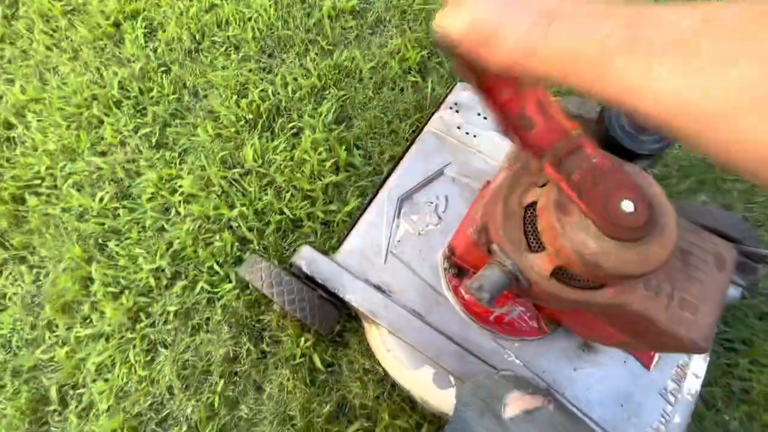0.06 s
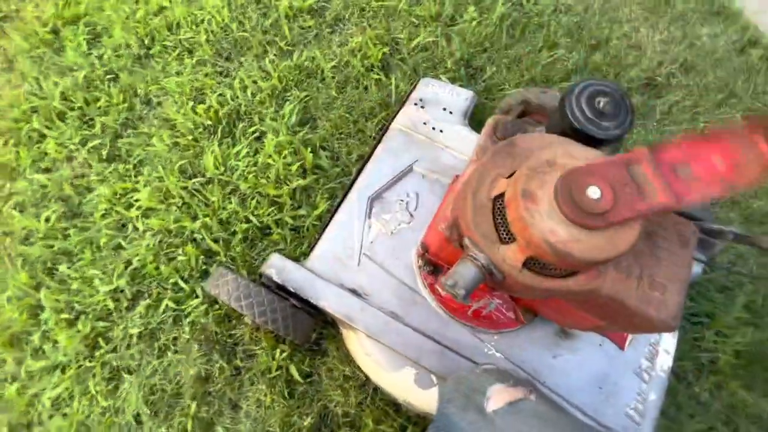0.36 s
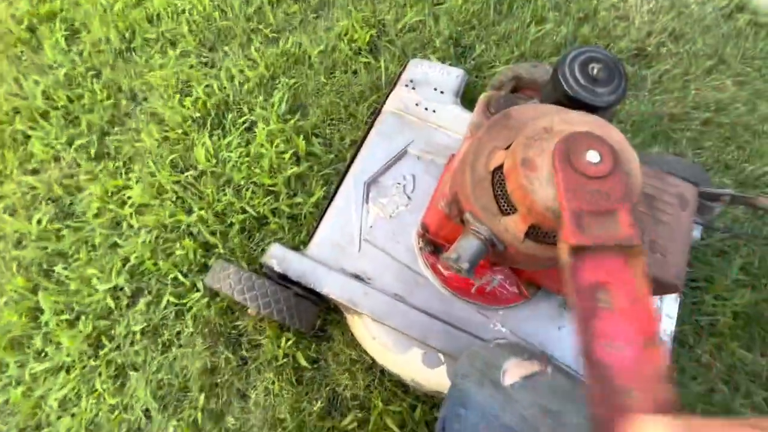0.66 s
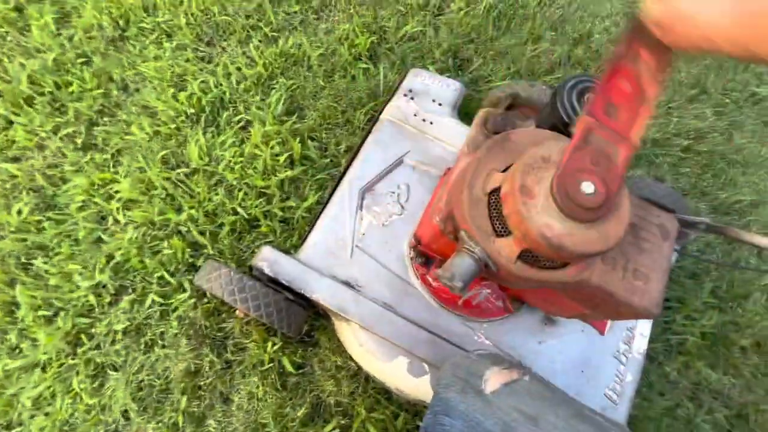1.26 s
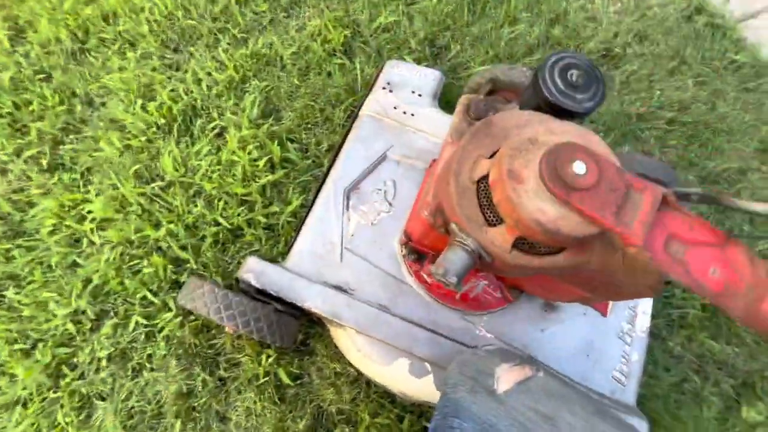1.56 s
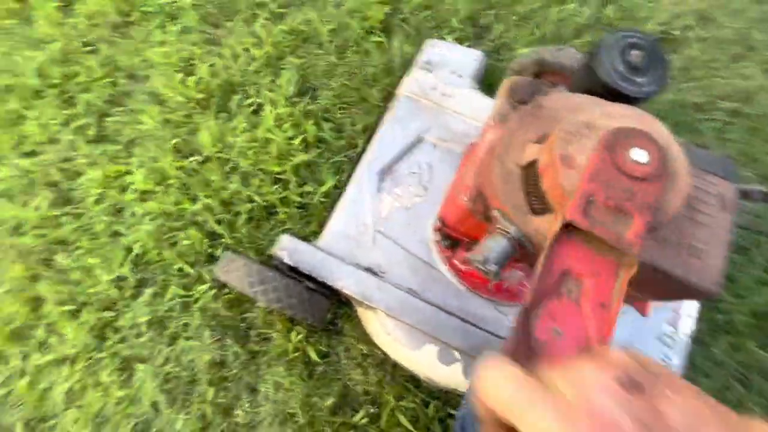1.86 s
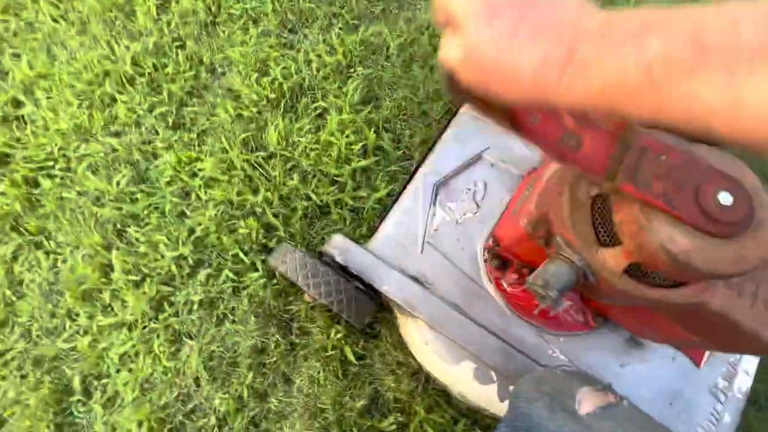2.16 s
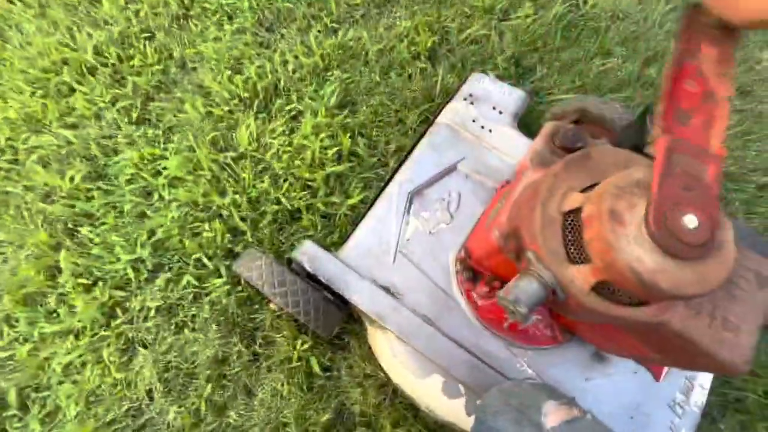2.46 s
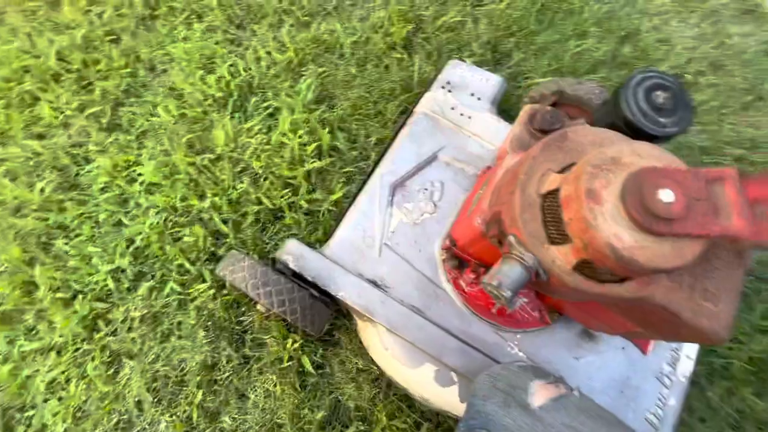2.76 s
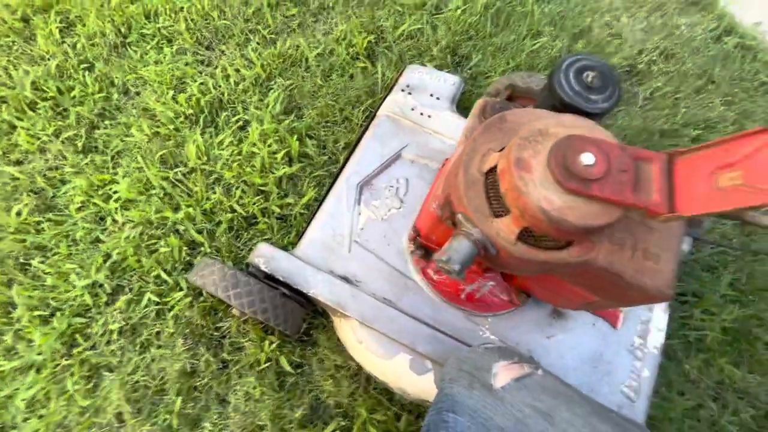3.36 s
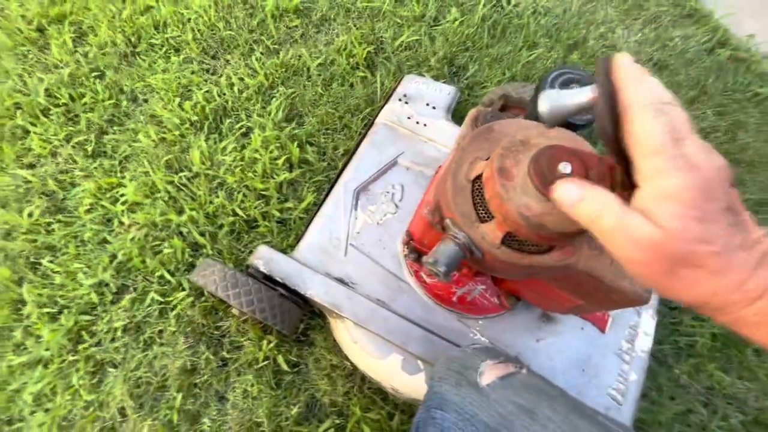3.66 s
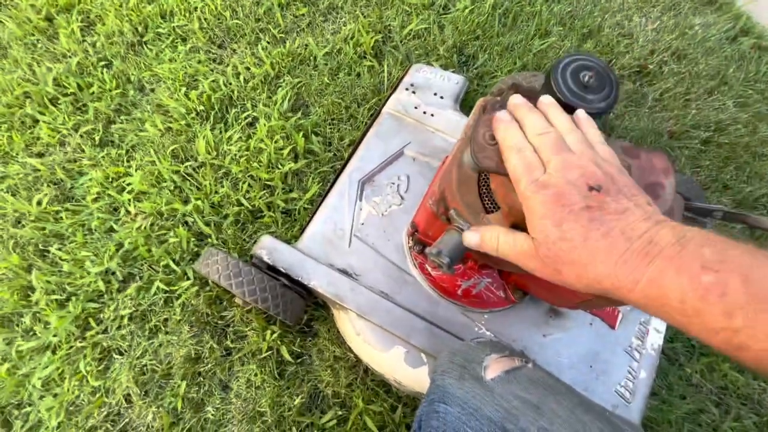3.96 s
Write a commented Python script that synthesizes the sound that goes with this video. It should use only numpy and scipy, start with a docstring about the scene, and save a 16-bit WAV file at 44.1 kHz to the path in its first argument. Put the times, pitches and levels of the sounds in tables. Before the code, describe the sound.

An old mower's wind-up starter ratchets at arm's length on a lawn, its ringing clicks slowing over light grinding. A dull thud and soft hinge ticks follow, then the handle folds with a loud clack, over faint outdoor rumble.

```python
"""Sharp ratchet clicks: an old mower's wind-up starter is cranked by hand on a lawn, an arm's length
from a stereo microphone. A pawl snaps over the teeth, ringing the starter cover and spring, more slowly
as the spring tightens. The crank is let go with a thud, its hinge ticks and rubs, and the handle is
folded shut with a loud clack. A faint outdoor rumble lies behind it all."""
import sys
import numpy as np
from scipy import signal
from scipy.fft import rfft, irfft
from scipy.io import wavfile
from scipy.ndimage import uniform_filter1d

SR = 44100
rng = np.random.default_rng(int(sys.argv[2]) if len(sys.argv) > 2 else 0)


def transcribe(signal):
    """Save signal, clipped to [-1, 1], as a 16-bit WAV file at the path in sys.argv[1]."""
    frames = np.atleast_2d(signal).T
    limited = np.clip(frames, -1, 1)
    pcm = np.round(limited * 32767).astype(np.int16)
    wavfile.write(sys.argv[1], SR, pcm)


N = 176400
T = np.arange(N) / SR
AGE = np.arange(2 ** 14) / SR  # seconds since a hit

# modes of the engine housing and of the spring: pitch_hz, gain_db, t60_s
HOUSING_MODES = [(541, -11.5, 0.063), (1069.5, -6.5, 0.035), (1294, -5.5, 0.019), (1541, -2.5, 0.03),
                 (1788, 1, 0.016), (2049, -12, 0.078)]
SPRING_MODES = [(5180, 2, 0.15), (5950, 2.5, 0.2), (6620, 1, 0.17), (7360, 0, 0.12), (10600, 6.5, 0.089)]
# dull spectrum of the rattle after a hit: frequency_hz, gain_db
RATTLE_SPECTRUM = [(8500, 4.5), (11000, -6), (12500, -25.5)]
# spectrum of dry metal contact: frequency_hz, gain_db
GRIND_SPECTRUM = [(80, -25.5), (250, -0.5), (540, 2), (780, -10), (1200, -9), (2500, -10.5), (5000, -17),
                  (10800, -19), (12500, -58.5)]
# the crank let go, then the handle shut: start_s, thud_db, deck_ring_db, handle_db, clash_db
HEAVY_BLOWS = [(2.982, -26, -30.5, -38, -45.5), (3.888, -50, -49, -46.5, -57.5),
               (3.9177, -19, -37.5, -18.5, -18), (3.933, -39, -45, -35, -47)]
SHUT_S = HEAVY_BLOWS[2][0]


def ratchet():
    """Each tooth drops the pawl, which snaps and rings along with the cover, housing and spring."""
    # pawl drops: start_s, snap_db, cover_db, cover_high_db, housing_db
    drops = [(0.0394, -17.5, -26, -35, -36.5), (0.09, -19, -29.5, -32.5, -35.0),
             (0.1395, -19.0, -27, -33.5, -34.5), (0.195, -16.5, -28.5, -37.5, -33),
             (0.252, -20.5, -34, -35, -35.5), (0.308, -18, -32.5, -25.5, -35.5),
             (0.3575, -17, -25.5, -28, -33.0), (0.4055, -16, -31, -28.5, -34),
             (0.4576, -20, -30.5, -37.5, -41), (0.5119, -21, -34.5, -37, -38),
             (0.5664, -18, -32.5, -34, -36.0), (0.6222, -20, -35.5, -33.5, -38.5),
             (0.6872, -21.5, -36, -34, -42), (0.7505, -18, -32.5, -33.0, -40.5),
             (0.8114, -17.5, -30.5, -32.5, -37.0), (0.8707, -19.5, -32, -37.5, -37),
             (0.9262, -18, -32, -41.5, -38.5), (0.98, -16.5, -34, -31.0, -37),
             (1.0305, -17, -28.5, -29.5, -40), (1.0856, -18.5, -29, -30.5, -41),
             (1.1394, -19.5, -28.0, -34.5, -38), (1.2008, -15, -29.5, -33, -37.5),
             (1.257, -16.5, -28.5, -31, -39.5), (1.3013, -16, -29.5, -28.5, -35),
             (1.3548, -17, -27, -24.5, -32.5), (1.417, -18.0, -30.5, -28, -36),
             (1.479, -21.5, -30.5, -34.5, -41.0), (1.5624, -18, -27.5, -37.5, -39.5),
             (1.6449, -19, -27.5, -31.5, -36), (1.7107, -18, -29.5, -30, -39.5),
             (1.7821, -22.5, -33, -32.5, -37.5), (1.856, -22.5, -35, -41.5, -39.5),
             (1.9185, -17.5, -25, -32.5, -33.5), (1.9851, -20.0, -30.5, -34, -36.5),
             (2.0613, -20.5, -33.0, -32.5, -34.5), (2.1387, -22, -33, -31, -40),
             (2.2263, -18, -30.5, -34, -35.5), (2.3069, -20, -27, -33, -30.5), (2.3758, -18, -25, -34, -32),
             (2.4397, -21.5, -30, -35.5, -34.5), (2.5202, -21.5, -32, -29.5, -31.5),
             (2.6088, -20.5, -31, -28, -32.0), (2.689, -19.5, -30.5, -27, -31.0),
             (2.7678, -17.5, -31.0, -27, -31.5), (2.829, -16.5, -26, -31.5, -33)]
    # low and high modes of the starter cover: pitch_hz, gain_db, t60_s
    cover_modes = [(2511, 4.5, 0.021), (2640, -0.5, 0.018), (2855, -2, 0.02)]
    cover_high_modes = [(3747, 0.5, 0.024), (3910, 2.5, 0.015), (4180, -5, 0.016)]
    cover_lag_s, housing_lag_s, slide_s = 0.0006, 0.00147, 0.0093
    diffuse = 0.63
    out = np.zeros((2, N))
    for start_s, snap_db, cover_db, cover_high_db, housing_db in drops:
        spring_db = -42 + 5 * rng.uniform(-1, 1)  # some teeth jolt the spring harder
        add(out, start_s, pawl_snap(), snap_db)
        for modes, ring_db in (cover_modes, cover_db), (cover_high_modes, cover_high_db):
            part = body(detuned(modes))
            add(out, start_s + cover_lag_s, ring(chatter(0.014, -21.5, 0.075, diffuse), part), ring_db)
            # the pawl rides up the tooth before it drops
            slide = noise(diffuse) * (AGE < slide_s) * AGE
            add(out, start_s - slide_s, ring(slide, part), ring_db - 19)
        housing = ring(chatter(0.027, -15, 0.093, 0.098), body(detuned(HOUSING_MODES)))
        add(out, start_s + housing_lag_s, housing, housing_db)
        spring = ring(noise(diffuse) * fade(0.0073), body(detuned(SPRING_MODES, spread=0.008)))
        add(out, start_s, spring, spring_db)
    return out


def pawl_snap():
    """The pawl lands and bounces once; every tooth has its own pattern of partials."""
    # spectrum of the snap: frequency_hz, gain_db
    spectrum = [(200, -38.5), (900, -26), (2000, -19.5), (3000, -7), (3400, -18.5), (4200, -9),
                (5000, -9.5), (5650, -3), (6350, -7.5), (7100, -1.5), (8500, -1.5), (9000, -5.5),
                (10700, -2), (12700, -25), (13150, -13.5), (13900, -30.5), (16000, -41)]
    bounce_s, t60_s = np.array([0.0017, 0.031]) * rng.uniform(0.6, 1.4, size=2)
    peak_hz = 8060 * (1 + 0.03 * rng.standard_normal())
    peak_db, width_hz, ripple_step_hz = 7.5, 1630, 170
    ripple_db = 4.5 * rng.standard_normal(256)

    def tooth_db(hz):
        partials = np.interp(hz / ripple_step_hz, np.arange(len(ripple_db)), ripple_db)
        return partials + peak_db / (1 + (2 * (hz - peak_hz) / width_hz) ** 2)

    landings = fade(0.002) + undb(-1.5) * fade(0.00093, bounce_s)
    contact = noise(0.089) * np.hypot(landings, undb(3) * fade(t60_s))
    rattle = undb(-22) * colour(noise(0.17) * fade(0.1), RATTLE_SPECTRUM)
    return colour(contact + rattle, spectrum, tooth_db) * pan(-0.5)


def pings():
    """After a few drops one partial sings on, beating against two close neighbours."""
    # lingering partials: start_s, pitch_hz, level_db
    partials = [(.195, 10730, -31.5), (.308, 6600, -35), (0.62, 6630, -30), (0.925, 2996, -36),
                (1.031, 8450, -23.5), (1.2, 10500, -34.5), (2.307, 6000, -35.5)]
    t60_s, split_hz = 0.11, 23
    out = np.zeros((2, N))
    for start_s, hz, db in partials:
        trio = [(hz, 0, t60_s), (hz + split_hz, -7, t60_s / 2), (hz - 2 * split_hz, -7, t60_s / 2)]
        add(out, start_s, pan(0) * irfft(body(trio)), db)
    return out


def blows():
    """The crank is let go and the handle slams shut: the deck booms, the handle rings, metal clashes."""
    # modes of the mower deck and of the folded handle: pitch_hz, gain_db, t60_s
    deck_modes = [(131.4, -9, 0.27), (225, 3.5, 0.16), (384, -2.5, 0.16), (444, -1, 0.089), (498, -3, 0.37),
                  (601, -1, 0.18)]
    handle_modes = [(862, -19, 0.074), (1017, -5, 0.024), (1562, -1.5, 0.027), (1653, 0.5, 0.014),
                    (1762, 4.5, 0.015), (1965, -18, .06)]
    # spectrum of the clash: frequency_hz, gain_db
    clash_spectrum = [(300, -18.5), (1000, -5.5), (3100, -5), (5800, -5.5), (8200, -3), (11000, -5),
                      (12500, -17.5), (16000, -40)]
    deck_lag_s, ping_hz = 0.00353, 11080
    out = np.zeros((2, N))
    for start_s, thud_db, deck_ring_db, handle_db, clash_db in HEAVY_BLOWS:
        add(out, start_s + deck_lag_s, deck_thud(), thud_db)
        add(out, start_s + deck_lag_s, irfft(body(deck_modes)) * pan(4.5), deck_ring_db)
        add(out, start_s, ring(chatter(0.017, -18, 0.11, 0.064), body(handle_modes)), handle_db)
        add(out, start_s, colour(chatter(0.017, -16.5, 0.11, 0.28), clash_spectrum), clash_db)
    thin_ring = np.sin(2 * np.pi * ping_hz * AGE) * fade(0.32) * (1 - fade(0.07))
    add(out, SHUT_S, pan(0) * thin_ring, db=-34)
    return out


def deck_thud():
    """One hard push on the deck, left of centre, with loose parts shaking after it."""
    # spectrum of the thud: frequency_hz, gain_db
    spectrum = [(30, -22.5), (130, -11.5), (250, -1.5), (480, 2.5), (600, -1), (740, -19.5), (2000, -28.5),
                (14000, -78)]
    push = (AGE == 0) + undb(-27) * chatter(0.064, -12, 0.19, 0.77)
    return colour(push, spectrum) * pan(4.5)


def crank_groans():
    """The crank binds twice and groans against the housing."""
    # groans: peak_s, pitch_hz, level_db
    groans = [(.203, 583, -36.5), (.274, 534, -33)]
    swell_s, t60_s = 0.0076, 0.062
    swell = np.exp(-(AGE / swell_s - 2) ** 2)
    out = np.zeros((2, N))
    for peak_s, hz, db in groans:
        response = body([(hz, 0, t60_s), (2 * hz, -5, t60_s / 2)]) + undb(-12.5) * body(HOUSING_MODES)
        add(out, peak_s - 2 * swell_s, ring(noise(0.2) * swell, response), db)
    return out


def gear_grind():
    """Gears and spring grind while the crank turns, a little to the left."""
    # course of the grinding: time_s, level_db
    levels = [(0, -40), (.3, -45.5), (.68, -48.5), (.9, -41.5), (1.53, -47.5), (1.8, -45.5), (2.85, -52.5),
              (3.05, -68)]
    return friction(GRIND_SPECTRUM, levels, rough_db=3, rate_hz=130, diffuse=0.27) * pan(3.4)


def hinge():
    """The hinge ticks as the handle lifts, and scrapes just before it shuts."""
    # two clear clinks with dull ones between: start_s, ring_db, contact_db
    ticks = [(3.094, -42, -47), (3.185, -60, -52), (3.23, -53, -57.5), (3.315, -42, -51)]
    # modes of the hinge: pitch_hz, gain_db, t60_s
    modes = [(944, -8, 0.057), (1450, -6, 0.04), (2020, 4, 0.087), (2350, -7.5, 0.043),
             (3640, -11.5, 0.035), (6830, -14, 0.022)]
    knock_s, swing_s = 3.456, 3.906
    out = np.zeros((2, N))
    for start_s, ring_db, contact_db in ticks:
        add(out, start_s, ring(chatter(0.0079, -30.5, 0.14, 0.43), body(modes)), ring_db)
        add(out, start_s, colour(chatter(0.018, -12, 0.12, 0.1), GRIND_SPECTRUM), contact_db)
    add(out, knock_s, deck_thud(), db=-55.5)  # a soft knock on the deck on the way up
    scrape = noise(0.13) * AGE * (AGE < SHUT_S - swing_s)
    add(out, swing_s, colour(ring(scrape, body(modes)), RATTLE_SPECTRUM), db=-27)
    return out


def hinge_rub():
    """The dry hinge rubs as the handle is raised, and the spring sings faintly along."""
    # course of the rubbing: time_s, level_db
    levels = [(3.05, -68.5), (3.17, -66), (3.5, -65.5), (3.799, -81.5)]
    # its spectrum: frequency_hz, gain_db
    spectrum = [(500, 0.5), (2000, 0), (4600, -9), (10900, -4.5), (12500, -39.5)]
    rub = friction(spectrum, levels, rough_db=1, rate_hz=23, diffuse=0.19)
    spring = signal.fftconvolve(rub, irfft(body(SPRING_MODES))[None])[:, :N]
    return rub + undb(-6) * spring * rub.std() / spring.std()


def outdoor_rumble():
    """A low, steady rumble from far beyond the lawn."""
    # spectrum of the open air: frequency_hz, gain_db
    spectrum = [(18, -41), (30, -21.5), (59, -1), (82, -2.5), (206, -13.5), (548, -24), (14000, -64.5)]
    rumble = colour(noise(0.16, N), spectrum)
    return rumble / rumble.std() * undb(-54.5)


def undb(db):
    return 10 ** (np.asarray(db) / 20)


def fade(t60_s, start_s=0):
    """Exponential decay from a starting time."""
    return (AGE >= start_s) * np.exp(-np.log(1000) * np.maximum(AGE - start_s, 0) / t60_s)


def pan(db):
    """Left and right gains, the left louder by db."""
    return undb(np.array([[db], [-db]]) / 2)


def noise(diffuse, size=len(AGE)):
    """Stereo noise; the diffuse share of its power is unrelated between the sides."""
    white = rng.standard_normal((3, size))
    return np.sqrt(1 - diffuse) * white[0] + np.sqrt(diffuse) * white[1:]


def colour(x, spectrum, extra_db=lambda hz: 0):
    """Causal filter through (frequency_hz, gain_db) points, plus an optional curve."""
    size, points = x.shape[-1], np.array(spectrum)
    hz = np.arange(size // 2 + 1) * SR / size
    gain_db = np.interp(np.log(hz + 1), np.log(points[:, 0]), points[:, 1]) + extra_db(hz)
    cepstrum = irfft(np.log(undb(gain_db)))
    cepstrum[1:size // 2] *= 2  # fold for minimum phase
    cepstrum[size // 2 + 1:] = 0
    return irfft(rfft(x) * np.exp(rfft(cepstrum)))


def body(modes):
    """Frequency response of damped modes of alternating sign."""
    return rfft(sum((-1) ** k * undb(db) * fade(t60_s) * np.sin(2 * np.pi * hz * AGE)
                    for k, (hz, db, t60_s) in enumerate(modes)))


def detuned(modes, spread=0.015):
    """Parts ring at slightly different pitches after every tooth."""
    return [(hz * (1 + spread * rng.standard_normal()), db, t60_s) for hz, db, t60_s in modes]


def chatter(t60_s, rattle_db, rattle_t60_s, diffuse):
    """Rough metal contact, with a faint dull rattle dying away behind it."""
    contact = noise(diffuse) * fade(t60_s)
    return contact + undb(rattle_db) * colour(noise(0.21) * fade(rattle_t60_s), RATTLE_SPECTRUM)


def ring(push, response):
    """A body rung by a push."""
    return irfft(rfft(push) * response)


def add(out, start_s, hit, db):
    """Place a hit; its level is its energy spread over 20 ms."""
    i = int(start_s * SR)
    hit = hit * undb(db) / np.sqrt(np.sum(hit ** 2) / 2 / (0.02 * SR))
    out[:, i:i + hit.shape[1]] += hit[:, :N - i]


def friction(spectrum, levels, rough_db, rate_hz, diffuse):
    """Uneven rubbing that wanders around a level curve."""
    hold = int(SR / rate_hz)
    steps = np.repeat(rng.standard_normal(N // hold + 1), hold)
    wander = 1.3 * uniform_filter1d(uniform_filter1d(steps, hold), hold)[:N]  # spread near 1
    rub = colour(noise(diffuse, N) * undb(rough_db * wander), spectrum)
    return rub / rub.std() * undb(np.interp(T, *np.array(levels).T))


def scene():
    """The mower, close by, reaches the two microphone ports out of phase; the rumble lies behind."""
    # phase between the ports: frequency_hz, left_lead_rad
    port_phase = [(0, -0.5), (4200, 0.86), (4700, -2.13), (6300, 1), (7900, 2.5), (9700, 3), (12000, 6),
                  (16000, 8.5)]
    mower = ratchet() + pings() + blows() + crank_groans() + gear_grind() + hinge() + hinge_rub()
    padded = np.pad(mower, ((0, 0), (0, N)))
    hz = np.arange(N + 1) * SR / (2 * N)
    lead_rad = np.interp(hz, *np.array(port_phase).T)
    ports = np.exp(0.5j * lead_rad * np.array([[1], [-1]]))
    return irfft(rfft(padded) * ports)[:, :N] + outdoor_rumble()


def record(dry):
    """The microphone has a narrow treble dip; the recorder clips at full scale and cuts the top."""
    dip_hz, dip_width_hz, top_hz = 9860, 670, 16000
    heard = signal.lfilter(*signal.iirnotch(dip_hz, dip_hz / dip_width_hz, fs=SR), dry)
    lowpass = signal.ellip(8, 0.2, 70, top_hz, fs=SR, output="sos")
    return signal.sosfilt(lowpass, np.clip(heard, -1, 1))


dry = scene()
out = record(dry)
transcribe(out)
```